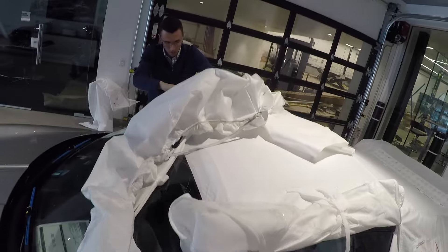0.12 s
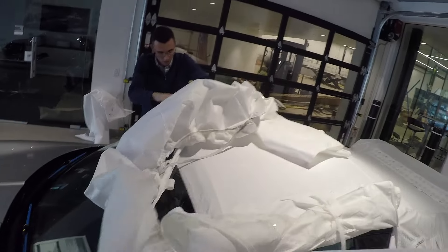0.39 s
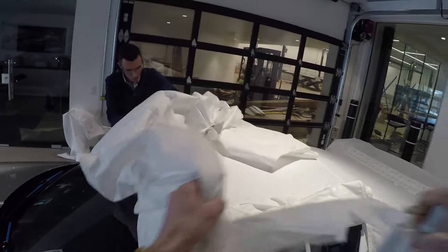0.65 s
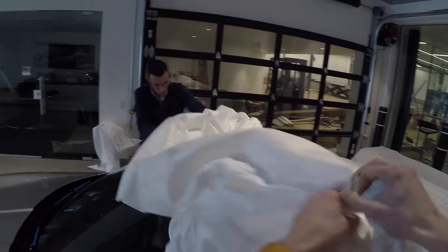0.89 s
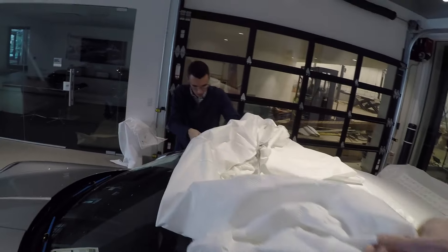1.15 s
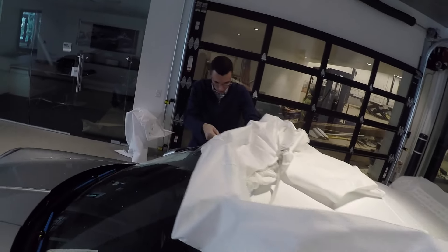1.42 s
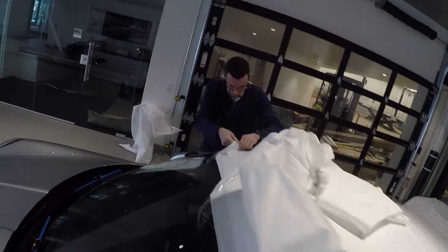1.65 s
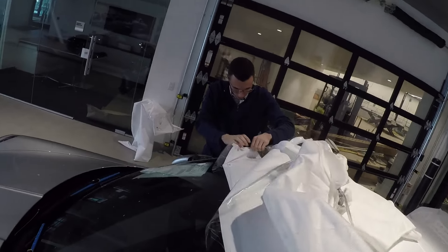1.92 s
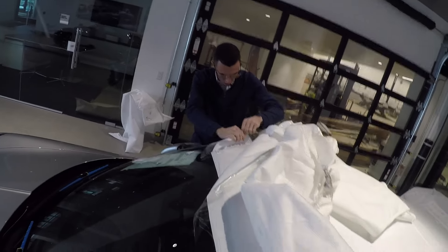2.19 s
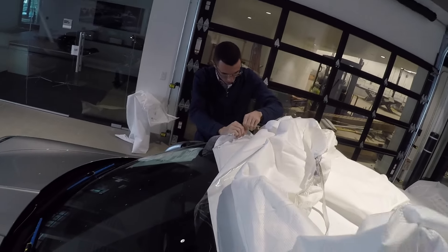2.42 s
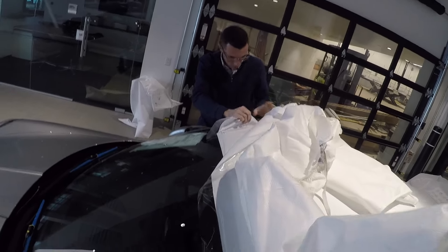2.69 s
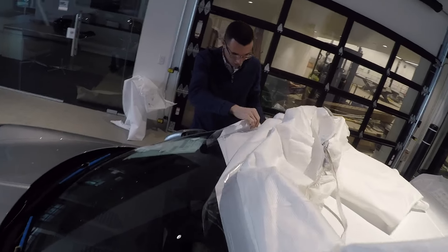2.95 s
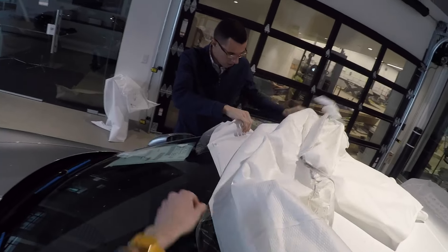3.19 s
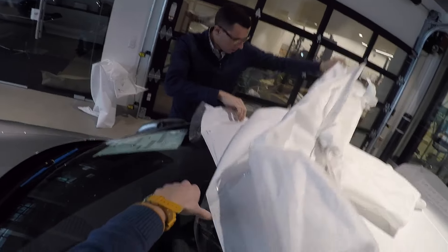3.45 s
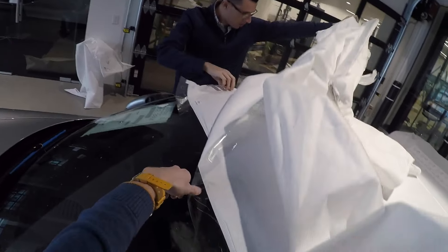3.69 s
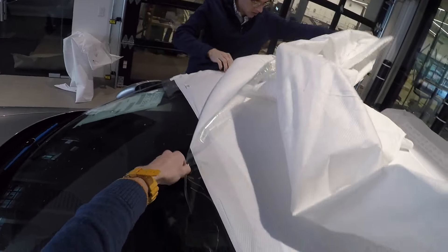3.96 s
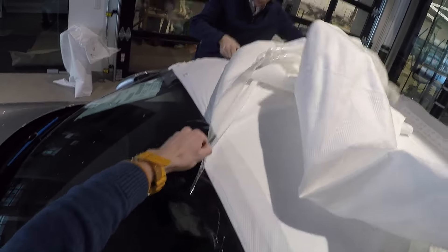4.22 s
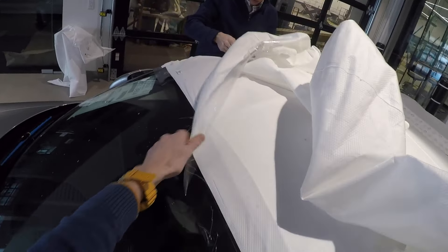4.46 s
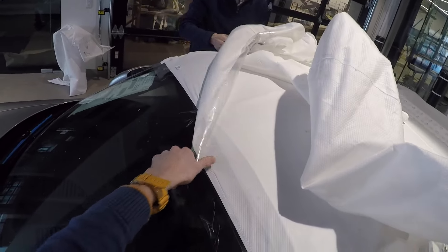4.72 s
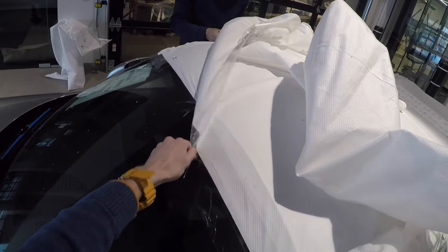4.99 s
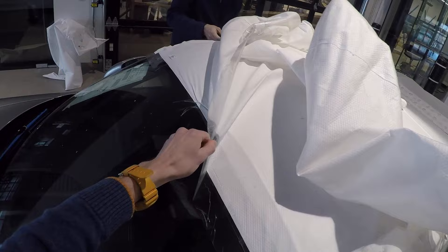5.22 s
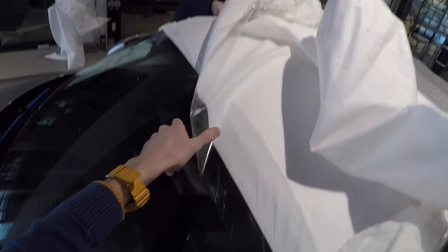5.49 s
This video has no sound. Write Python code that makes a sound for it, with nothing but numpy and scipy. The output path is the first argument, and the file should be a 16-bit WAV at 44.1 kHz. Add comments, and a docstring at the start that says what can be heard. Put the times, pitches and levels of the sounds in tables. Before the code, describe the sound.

Stiff protective sheeting rustles as hands drag and bunch it, then sharp crackles as clear film is peeled, over faint hiss.

```python
"""Stiff sheet and clear film

Hands drag and bunch a stiff protective sheet and peel clear film in a large hard room.
Creases rustle as noise of clumped sizes; snaps, film ticks and bumps are short noise bursts the room answers.
The small enclosed camera microphone rings near 4 kHz and adds steady shaped hiss;
the wearer's movement is narrow noise near 30 Hz.
"""
import sys
import numpy as np
from scipy import signal
from scipy.fft import rfft, irfft
from scipy.io import wavfile
from scipy.ndimage import uniform_filter1d

SR = 44100
rng = np.random.default_rng(int(sys.argv[2]) if len(sys.argv) > 2 else 0)


def master(y):
    """Save y as 16-bit WAV."""
    cut = np.clip(np.atleast_2d(y).T, -1, 1)
    pcm = np.round(cut * 32767)  # scale
    wavfile.write(sys.argv[1], SR, pcm.astype(np.int16))


def volts_from_decibels(level):
    """Turn decibel levels (scalar or array-like) into linear amplitude factors."""
    exponent = np.asarray(level, float) / 20
    return 10 ** exponent


N = 247842  # samples

BODY_HZ, TREBLE_HZ = 3300, 6000  # the microphone's ringing band lies between body and treble


def evened(x):
    """Scales to rms 1."""
    return x / np.sqrt(np.mean(x ** 2) + 1e-20)


def smoothed_twice(x, samples):
    """Two running means, for slow wandering."""
    return uniform_filter1d(uniform_filter1d(x, samples), samples)


def read(points, hz):
    """Reads a table on a log-frequency axis."""
    f, value = np.transpose(points)
    return np.interp(np.log(hz + 1), np.log(f + 1), value)


def curve(rows):
    """One value a sample for each column after the time."""
    s, *columns = np.transpose(rows)
    return [np.interp(np.arange(N) / SR, s, c) for c in columns]


def add(mix, s, sound):
    """Mixes a sound in at time s, cut at the end of the mix."""
    part = mix[round(s * SR):][:len(sound)]
    part += sound[:len(part)]


def band(x, lo_hz, hi_hz):
    """Band-pass filter."""
    return signal.sosfilt(signal.butter(4, [lo_hz, hi_hz], "band", fs=SR, output="sos"), x)


# Fine peaks and notches of the microphone housing: (centre [Hz], width [Hz], level [dB])
HOUSING_PEAKS = [(1396, 25, -42), (1460, 194, 8.5), (3423, 240, -7), (3823, 62, -28), (4390, 1000, 5),
                 (5360, 260, 4.5), (6403, 680, 10), (7070, 790, 6), (8200, 240, 1.5), (8500, 500, -1.5),
                 (10900, 270, 2), (12700, 700, -5), (13700, 820, -2), (15200, 600, -8)]


def housing_peaks_db(hz):
    """Sum of the housing's resonance peaks and notches, in dB."""
    return sum(db / (1 + (2 * (hz - f) / width) ** 2) for f, width, db in HOUSING_PEAKS)


# Broad colour of the enclosed microphone: (frequency [Hz], level [dB])
HOUSING_COLOUR = [(290, -47), (500, -13.5), (1380, -9), (1480, -8), (1970, -0.5), (3440, -7.5), (4260, 2.5),
                  (6640, -26.5), (7880, -15), (8460, -21), (15200, -26)]


def housed(x):
    """The enclosed microphone as a causal minimum-phase filter, so that it rings only after a sound."""
    hz = abs(np.fft.fftfreq(8192, 1 / SR))
    gain_db = np.maximum(read(HOUSING_COLOUR, hz) + housing_peaks_db(hz), -80)
    log_gain = np.log(volts_from_decibels(gain_db))
    taps = np.fft.ifft(np.exp(np.conj(signal.hilbert(log_gain)))).real[:2048]
    return signal.oaconvolve(x, taps)[:len(x)]


# Spectrum shape of room air and microphone noise: (frequency [Hz], relative density [dB per Hz])
HISS_SHAPE = [(26, -26), (45, 4), (66, -12), (103, -19.5), (189, -26), (1040, -33.5), (1960, -30.5),
              (3420, -35.5), (4260, -28), (5850, -46.5), (8630, -47), (13700, -43), (15100, -50)]
HISS_DB, HISS_DRIFT_DB = -58, 1.84  # middle level; rms drift


def hiss():
    """Room air and microphone self-noise: shaped noise, drifting a little in level."""
    hz = np.fft.rfftfreq(N, 1 / SR)
    shape_db = read(HISS_SHAPE, hz) + 0.44 * housing_peaks_db(hz)
    steady = irfft(rfft(rng.standard_normal(N)) * volts_from_decibels(shape_db), N)
    drift = evened(smoothed_twice(rng.standard_normal(N), 5000))
    return volts_from_decibels(HISS_DB + HISS_DRIFT_DB * drift) * steady / np.std(band(steady, 54.8, 15600))


# How hard the wearer's movement shakes the camera: (time [s], rms level [dB])
SHAKING = [(0.0, -44.5), (0.17, -39.5), (0.48, -46.5), (0.51, -36.5), (1.2, -38), (1.24, -47), (1.31, -42),
           (1.5, -31), (1.61, -41), (1.67, -26.5), (1.83, -41.5), (2.13, -32.5), (2.17, -42.5),
           (2.55, -35.5), (2.58, -29.5), (2.96, -38.5), (4.21, -32), (4.27, -44), (4.3, -36), (4.6, -32),
           (4.63, -42), (5.06, -42), (5.09, -27), (5.21, -41.5), (5.43, -36), (5.62, -40.5)]
RUMBLE_HZ, RUMBLE_WANDER_HZ = 30.57, 1.52  # centre; rms wander


def rumble():
    """Movement shakes the camera: narrow deep noise whose centre wanders."""
    db = curve(SHAKING)[0]
    hz = RUMBLE_HZ + RUMBLE_WANDER_HZ * evened(smoothed_twice(rng.standard_normal(N), 9000))
    slow = rng.standard_normal((2, N))
    slow = signal.sosfilt(signal.butter(3, 11, fs=SR, output="sos"), slow[0] + 1j * slow[1])
    carrier = np.exp(2j * np.pi * np.cumsum(hz) / SR)
    shake = ((slow / np.std(slow) + 0.28) * carrier).real  # 0.28 keeps some steady tone
    return volts_from_decibels(db) * shake / np.sqrt(uniform_filter1d(shake ** 2, 7000) + 1e-9)


# Decay of the large hard room: (frequency [Hz], t60 [s])
ROOM_DECAY = [(500, 0.99), (1500, 0.58), (4000, 0.61), (10000, 0.55)]
ROOM_DB = -11.5  # gain of the unit-energy room tail


def room(x):
    """Reflections as sparse taps of random sign, each band dying at its own speed."""
    taps = np.zeros(SR)
    at = np.arange(300, SR - 20, 20)
    taps[at + rng.integers(0, 20, len(at))] = rng.choice([-1., 1.], len(at))
    hz, t, z = signal.stft(taps, SR, nperseg=256)
    decay = volts_from_decibels(-60 * t / read(ROOM_DECAY, hz)[:, None])
    tail = signal.istft(z * decay, SR, nperseg=256)[1]
    return signal.fftconvolve(x, tail / np.linalg.norm(tail))[:N]


# Knocks of the bundled sheet: (time [s], peak [dB], lowest [Hz], highest [Hz], t60 [s])
KNOCKS = [(0.264, -54.5, 150, 400, 0.042), (.66, -47, 53, 111, .11), (0.831, -53, 111, 490, 0.18),
          (1.318, -55, 295, 599, 0.022), (1.492, -48, 55, 121, 0.23), (1.578, -51.5, 110, 234, .07),
          (1.907, -46.5, 91, 704, 0.031), (2.09, -50, 407, 1180, 0.018), (2.117, -40.5, 404, 1280, 0.033),
          (2.47, -46.5, 148, 1310, 0.39), (2.713, -54, 119, 508, .07), (3.441, -53, 302, 1200, 0.062),
          (4.035, -38.5, 692, 1020, 0.013), (4.065, -41, 470, 1200, 0.02), (4.079, -47.5, 214, 505, 0.14),
          (4.42, -52, 119, 294, 0.11), (4.467, -49.5, 79, 290, 0.15), (4.968, -48, 697, 1350, .025),
          (5.585, -45.5, 99, 700, 0.73)]
BUMP_RISE = 0.042  # share of the t60 that a bump takes to swell


def bumps():
    """Bundled sheet lands or knocks: a soft puff of band noise with no clear ring."""
    out, t = np.zeros(N), np.arange(8000) / SR
    for s, db, lo_hz, hi_hz, t60 in KNOCKS:
        swell = np.minimum(t / (BUMP_RISE * t60), 1)
        puff = rng.standard_normal(len(t)) * swell * volts_from_decibels(-60 * t / t60)
        sound = band(puff, lo_hz, hi_hz)
        add(out, s, volts_from_decibels(db) * sound / abs(sound).max())
    return out


# Tiny bright ticks of film: (time [s], peak [dB])
FILM_TICKS = [(0.031, -46), (4.2154, -50), (4.2284, -49), (4.2374, -50), (4.2462, -47), (4.4468, -51),
              (4.8124, -51), (5.4164, -51)]


def ticks():
    """A speck of film unsticks: a faint crack with treble only."""
    out, t = np.zeros(N), np.arange(600) / SR
    for s, db in FILM_TICKS:
        crack = rng.standard_normal(len(t)) * volts_from_decibels(-60 * t / 0.014)
        tick = band(housed(crack), 6500, 14000)
        add(out, s, volts_from_decibels(db) * tick / abs(tick).max())
    return out


# Sudden pulls: (start [s], hold [s], rustle level [dB], treble against it [dB], rustle fade [dB per s])
SUDDEN_PULLS = [(0.112, 0.022, -41.5, -8.5, 86), (.19, .065, -44, -13.5, 54),
                (2.452, 0.083, -57.5, -11, 150), (2.725, .005, -50, -7, 109), (4.028, 0.016, -35, -30, 400),
                (4.066, 0.012, -37.5, -8, 202), (4.115, .1, -47.5, -19, 67), (4.954, 0.053, -53, -3.5, 100),
                (5.026, .17, -48, -5.5, 200), (5.396, 0.0068, -46.5, -19, 350),
                (5.461, 0.0088, -49, -10, 300)]
PULL_RISE_S, TREBLE_FADES = 0.0052, 1.9  # the treble fades this many times faster


def pulls():
    """Power of the pulls, rustle and treble: each jumps up, holds and fades."""
    t, power = np.arange(N) / SR, np.zeros((2, N))
    for s, hold, db, treble_db, fade in SUDDEN_PULLS:
        rise = np.clip((t - s) / PULL_RISE_S, 0, 1)
        after = np.maximum(t - s - hold, 0)
        rustle_db = db - fade * after
        bright_db = db + treble_db - TREBLE_FADES * fade * after
        power += (rise * volts_from_decibels(np.array([rustle_db, bright_db]))) ** 2
    return power


CRACKLE_PER_S = 140  # mean rate during a hold
CRACKLE_DB, CRACKLE_SPREAD_DB = 14.5, 9  # largest, over the pull's rustle; range below it
CRACKLE_TREBLE_DB = -15  # added to the pull's treble balance


def crackle():
    """While a long pull holds, further creases let go at random: rows for snaps()."""
    rows = []
    for s, hold, db, treble_db, fade in SUDDEN_PULLS:
        if hold <= 0.05:
            continue
        for when, keep, size, pitch, share in rng.random((30, 5)):
            if keep < CRACKLE_PER_S * hold / 30:
                peak_db = db + CRACKLE_DB - CRACKLE_SPREAD_DB * size
                boom_hz = 1800 + 1200 * pitch
                rows.append((s + when * hold, peak_db, CRACKLE_TREBLE_DB + treble_db, boom_hz, 0.25 * share))
    return rows


# Creases letting go: (time [s], nominal peak [dB], treble against it [dB], sheet boom [Hz], boom share [0-1])
CREASE_SNAPS = [(0.1216, -31, -33, 2680, 0), (0.1364, -27.5, -28, 2050, 0.18), (0.198, -42, -32, 2330, 0.2),
                (0.2109, -32, -33, 2230, 0), (0.2711, -29, -30, 1570, 0.11),
                (0.411, -35.5, -23, 2400, 0.76), (0.4214, -33, -30, 2160, 0.2),
                (0.8764, -37.5, -41, 2750, 0.8), (1.297, -34, -21, 1990, 0),
                (2.2554, -33.5, -30, 1570, 0.45), (3.4006, -33.5, -29, 2800, 0),
                (3.4459, -40, -40, 1850, 0.86), (3.843, -41, -26, 1570, 0.24),
                (4.0276, -24, -20, 2520, 0.05), (4.0339, -11, -29, 2920, 0.36),
                (4.0431, -23.5, -22, 3250, 0.2), (4.0642, -20.5, -15, 2530, 0.8),
                (4.074, -32, -8, 1850, 0.7), (4.0816, -29, -17, 1640, 0.7), (4.263, -39, -17.5, 2040, 0.3),
                (4.47, -28.5, -33, 2240, 0.61), (4.801, -29, -31, 3180, 0.2),
                (4.9674, -24.5, -25.5, 1810, 0.35), (4.9916, -35, -15, 2500, 0.56),
                (5.0155, -32.5, -14.5, 2600, 0.4), (5.0374, -41, -29, 2370, 0.5),
                (5.057, -42, -24, 1840, 0), (5.1493, -30, -26, 2030, 0.1), (5.1797, -30.5, -20, 2450, 0.5),
                (5.2064, -36.5, -13.5, 2520, 0.74), (5.4061, -35, -14, 2270, 0.58),
                (5.4677, -42, -27, 2720, 0.1), (5.4774, -31.5, -21.5, 1963, 0.15)]


def snaps():
    """A crease lets go: a sudden crack of a few ms, then the sheet patch booms briefly in a wide band."""
    out, t = np.zeros(N), np.arange(1200) / SR
    for s, db, treble_db, hz, share in list(CREASE_SNAPS) + crackle():
        noise = rng.standard_normal((2, len(t)))
        crack = housed(noise[0] * (1 - np.exp(-t / 0.0001)) * volts_from_decibels(-60 * t / 0.013))
        low, high = band(crack, 2070, TREBLE_HZ), band(crack, 6430, 17700)
        push = noise[1] * t * volts_from_decibels(-60 * t / 0.0083)  # the patch answers a moment after the crack
        boom = band(push, 0.79 * hz, 1.133 * hz)
        sound = (1 - share) * low / abs(low).max() + share * boom / abs(boom).max()
        treble = high / np.std(high[:400])
        add(out, s, volts_from_decibels(db) * (sound + volts_from_decibels(treble_db) * treble))
    return out


PATCHY_DB = 1.5  # rms


def patchy(x):
    """Parts of the sheet favour different pitches: patches of some hundred Hz by some ten ms swell and sink."""
    z = signal.stft(x, nperseg=256)[2]
    field = rng.standard_normal(z.shape[::-1])  # time by frequency
    field = evened(uniform_filter1d(uniform_filter1d(field, 14, 0), 5, 1))
    return signal.istft(z * volts_from_decibels(PATCHY_DB * field.T), nperseg=256)[1][:N]


PANEL_S = 0.00055  # delay from the reflection's extra path
# strength 0-1 of the reflection; stronger while the sheet slides along the panel, from and to [s]
PANEL, PANEL_SLIDING, SLIDE = 0.21, 0.37, (1.9, 2.1)


def panel(treble):
    """A hard glossy panel returns the treble once, a moment late, which combs it."""
    t = np.arange(N) / SR
    sliding = (t > SLIDE[0]) & (t < SLIDE[1])
    bounce = np.where(sliding, PANEL_SLIDING, PANEL)
    late = np.roll(treble, round(PANEL_S * SR))
    return (treble + bounce * late) / np.sqrt(1 + bounce ** 2)


CREASES_PER_S = 3000
DRAG_SPREAD_DB, PULL_SPREAD_DB = 1.3, 2  # spread of crease sizes


def creases(spread_db):
    """Thousands of small creases flip over a bed of noise; sizes come in clumps a few ms long."""
    flips = (rng.random(N) < CREASES_PER_S / SR) * rng.standard_normal(N)
    clumps = evened(uniform_filter1d(rng.standard_normal(N), 90))
    size = volts_from_decibels(spread_db * clumps)
    size /= np.sqrt(uniform_filter1d(size ** 2, 6000))
    return size * (evened(flips) + 2.1 * rng.standard_normal(N))


# Steady dragging of the sheet: (time [s], level in the ringing band [dB], treble against it [dB])
STEADY_DRAG = [(0, -56, -8), (.58, -55.5, -11.5), (.71, -55.5, -9.5), (.85, -49.5, -7.5),
               (1.03, -54.5, -9.5), (1.11, -50.5, -8), (1.22, -52.5, -7.5), (1.31, -45.5, -8),
               (1.45, -47.5, -10.5), (1.6, -45.5, -13.5), (1.69, -49.5, -11), (1.78, -45.5, -9),
               (2.07, -47.5, -8), (2.13, -51, -12), (2.2, -48.5, -6.5), (2.43, -53, -10), (2.51, -50.5, -8),
               (2.63, -59, -10), (3.0, -56.5, -8.5), (3.41, -53, -13), (3.73, -60.5, -8.5),
               (3.81, -63, -8.5), (4.03, -63, -6), (4.47, -55, -12.5), (4.75, -79, -3), (4.95, -73, 4),
               (5.27, -51, -9.5), (5.39, -60, -12), (5.5, -62, -10), (5.57, -53.5, -13), (5.62, -63, -10)]
# Body band under the rustle: (time [s], level when the rustle is at -51.5 dB [dB])
RUSTLE_BODY = [(0, -57), (.5, -54), (1.1, -55), (1.7, -57), (2.2, -56.5), (2.9, -54.5), (3.45, -55.5),
               (3.9, -60), (4.1, -54.5), (4.5, -50), (4.9, -50), (5.3, -57.5), (5.62, -56.5)]
BODY_FOLLOWS = 0.72  # dB of body per dB of rustle


def rustle():
    """Flipping creases heard through the microphone; dragging and pulls set the level of three bands."""
    drag_db, tilt_db = curve(STEADY_DRAG)
    pulled, pulled_treble = pulls()
    power = volts_from_decibels(drag_db) ** 2 + pulled
    level_db = 10 * np.log10(power)
    treble_db = 10 * np.log10(volts_from_decibels(drag_db + tilt_db) ** 2 + pulled_treble)
    body_db = curve(RUSTLE_BODY)[0] + BODY_FOLLOWS * (level_db + 51.5)
    spread_db = DRAG_SPREAD_DB + (PULL_SPREAD_DB - DRAG_SPREAD_DB) * pulled / power
    heard = patchy(housed(creases(spread_db)))
    body = evened(band(heard, 498, BODY_HZ))
    ring = evened(band(heard, BODY_HZ, TREBLE_HZ))
    treble = evened(panel(band(heard, TREBLE_HZ, 17800)))
    return volts_from_decibels(level_db) * ring + volts_from_decibels(treble_db) * treble + volts_from_decibels(body_db) * body


def scene():
    """All sources at the microphone; the room answers the snaps, ticks and bumps."""
    hits = snaps() + ticks() + bumps()
    return (rustle() + hits + volts_from_decibels(ROOM_DB) * room(hits) + rumble() + hiss())[None]


def top_cut(x):
    """Nothing passes above the cut-off."""
    return signal.sosfilt(signal.butter(12, 16500, fs=SR, output="sos"), x)


EDGE_HZ = 15310  # upper band edge


def record(dry):
    """Treble above the band edge is held 30 dB down."""
    hz = np.fft.rfftfreq(N, 1 / SR)
    cut_db = -30 / (1 + np.exp(np.clip((EDGE_HZ - hz) / 30, -50, 50)))
    limited = irfft(rfft(dry) * volts_from_decibels(cut_db), N)
    return top_cut(limited)


dry = scene()
out = record(dry)
master(out)
```